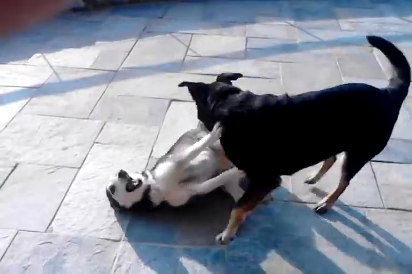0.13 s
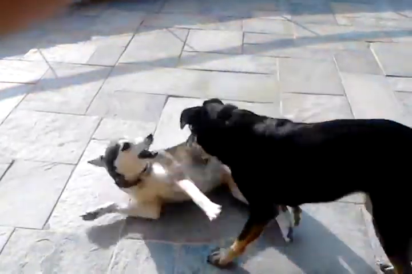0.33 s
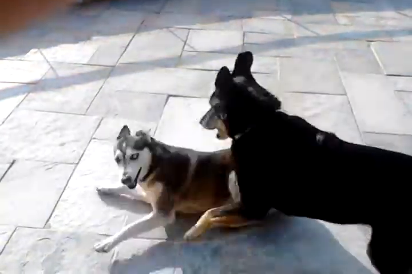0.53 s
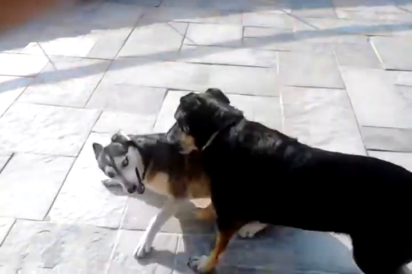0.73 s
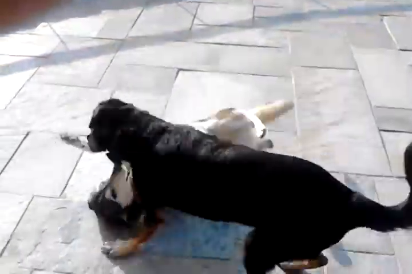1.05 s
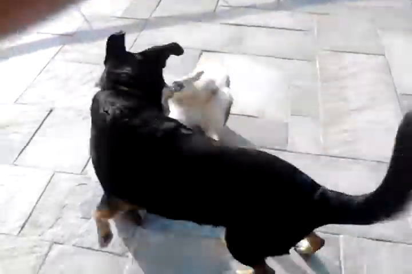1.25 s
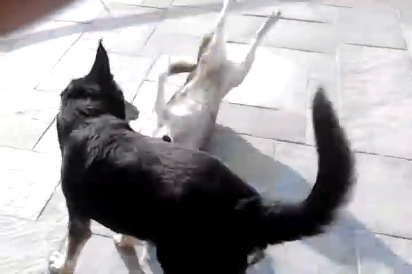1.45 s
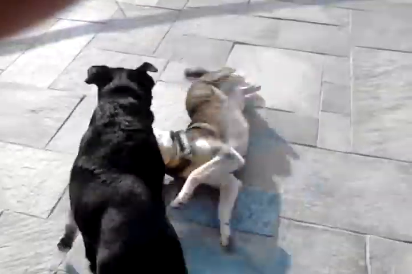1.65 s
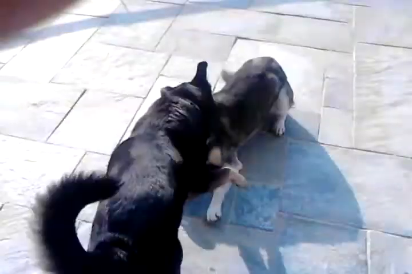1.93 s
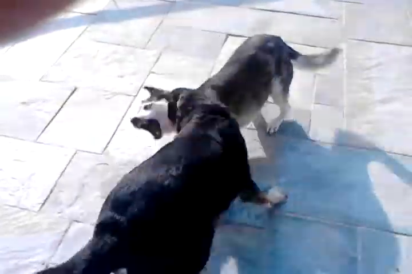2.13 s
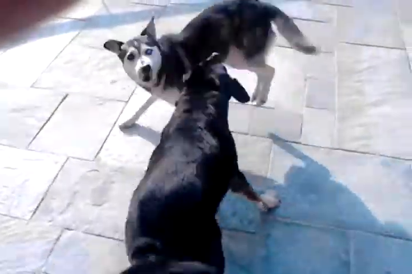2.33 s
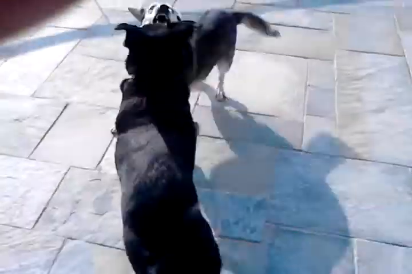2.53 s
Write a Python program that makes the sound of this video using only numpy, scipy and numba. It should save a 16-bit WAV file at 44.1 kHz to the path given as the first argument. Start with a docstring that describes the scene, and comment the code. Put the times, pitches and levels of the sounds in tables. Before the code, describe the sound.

Play-fighting dog growls in ragged, throaty bursts with hard catches, briefly pausing, then swelling; a second dog grunts low, claws tick and paws scuff on stone, close mono microphone, quiet open air with short wall echoes.

```python
"""A stone terrace: two dogs wrestle close by, heard in mono over quiet outdoor air.
One growls: a low chest tone, plus uneven pulses ringing in throat and mouth, with hard pops and snarls.
The other gives short rough grunts from similar pulses; thin squeals are brief wavering sine tones.
Paws thump as damped sine tones, claws click as noise bursts, and scuffs are noise mixed with grit.
Two short echoes and a faint noise tail stand for the slabs and nearby walls."""
import sys
import numpy as np
from scipy import signal
from scipy.fft import rfft, irfft
from scipy.io import wavfile
from scipy.ndimage import uniform_filter1d
from numba import njit

SR = 44100
rng = np.random.default_rng(int(sys.argv[2]) if len(sys.argv) > 2 else 0)


def store_pcm(level_fs):
    """Save levels as 16-bit WAV."""
    pcm = np.round(np.clip(level_fs, -1, 1) * 32767).astype(np.int16)
    wavfile.write(sys.argv[1], SR, np.atleast_2d(pcm).T)


N = 119070
T = np.arange(N) / SR  # time of every sample in seconds

# Colour of the outdoor background. Each row: frequency in Hz, strength in dB per Hz (relative).
AIR_COLOUR = [(25, -13.5), (70, -16.5), (150, 0), (300, 1.5), (700, -14.5), (1200, -6), (2200, -10),
              (3500, -10), (6500, -5), (9000, -31)]
# Strength of the growl, one list per stretch, before each part's overall level is added.
# Each row: time in seconds, chest tone in dB, throat in dB, mouth in dB.
GROWL_LEVELS = [
    [(0.0, -20.5, -18.5, -28), (0.046, -34.5, -26, -39.5), (0.078, -35.5, -29.5, -39),
     (0.086, -32.5, -36, -49), (0.108, -41, -34, -38), (0.182, -22.5, -18.5, -22), (0.2, -25, -32, -31),
     (0.242, -43, -33.5, -31.5), (0.278, -34, -36, -33.5), (0.32, -40, -45.5, -45), (0.34, -61.5, -51, -91)],
    [(0.5, -63, -73, -58), (0.522, -28.5, -40, -31), (0.582, -29.5, -28, -41), (0.592, -21.5, -26, -29.5),
     (0.616, -24, -26.5, -44), (0.722, -30, -28, -25), (0.744, -22, -23.5, -29),
     (0.868, -24.5, -16.5, -25.5), (0.89, -20.5, -17, -27.5), (0.982, -37, -17.5, -23.5),
     (1.0, -38, -13, -31)],
    [(1.0, -41, -16.5, -27), (1.072, -16, -22, -27.5), (1.084, -21.5, -21, -23.5), (1.178, -21, -12.5, -28),
     (1.202, -20.5, -28.5, -29.5), (1.22, -28.5, -15.5, -29.5), (1.258, -24, -23, -30),
     (1.302, -13.5, -15, -19.5), (1.342, -27, -16, -22.5), (1.39, -18.5, -19, -20.5),
     (1.46, -36.5, -30, -39)],
    [(1.46, -45, -53, -25), (1.478, -81, -35, -32), (1.51, -18.5, -25.5, -30), (1.558, -77, -33, -32),
     (1.59, -30.5, -48, -31), (1.618, -53, -36, -26), (1.66, -53, -49, -39.5), (1.676, -46, -32, -34),
     (1.71, -39, -45, -35.5), (1.76, -71, -42, -36), (1.8, -68, -60, -57)],
    [(1.81, -50, -58, -34), (1.842, -29, -24.5, -27.5), (1.88, -14, -18.5, -40), (1.922, -24.5, -14, -25.5),
     (1.95, -22, -24.5, -29.5), (1.988, -31, -22.5, -24), (2.06, -25, -15.5, -25), (2.134, -9, -22, -31),
     (2.168, -13.5, -19, -19.5), (2.218, -21.5, -16.5, -28.5), (2.25, -22, -11.5, -20)],
    [(2.25, -40, -15.5, -30), (2.29, -14.5, -18, -20), (2.314, -24.5, -10.5, -26), (2.348, -20.5, -22, -29),
     (2.388, -24.5, -20, -26), (2.442, -17, -18.5, -29), (2.548, -33, -15, -28),
     (2.574, -21.5, -18.5, -27.5), (2.672, -46.5, -34.5, -35), (2.692, -26, -19.5, -38),
     (2.7, -40, -30, -45)],
]
# Moments when the growl catches in a hard pop. Each row: time in seconds, level in dB.
POP_TIMES = [(0.15, -12), (0.826, -5), (0.854, -2.5), (0.892, 0), (0.911, -0.5), (1.163, 1), (1.265, -1.5),
             (1.32, -9), (1.885, -13.5), (1.919, -8.5), (2.243, -8), (2.261, -4), (2.308, -7), (2.325, -2),
             (2.353, -14), (2.375, -5.5), (2.408, -4), (2.562, -4.5)]


def from_db(db):
    """Turn decibels into gain."""
    return 10 ** (np.asarray(db) / 20)


def rms_one(x):
    """Scale a sound to an average (rms) level of 1."""
    return x / np.sqrt(np.mean(x ** 2) + 1e-20)


def in_time(rows):
    """Draw each column of a table as a curve with a value at every sample."""
    seconds, *columns = np.transpose(rows)
    return [np.interp(T, seconds, column) for column in columns]


def butter(x, hz, kind, order=2):
    """Keep low, high or middle frequencies with a Butterworth filter."""
    return signal.sosfilt(signal.butter(order, hz, kind, fs=SR, output="sos"), x)


def drift(rate_hz):
    """Random wander of average size 1, mostly slower than the given rate."""
    noise = rng.standard_normal(2 * N)
    return rms_one(butter(noise, rate_hz, "low")[N:])  # the first half lets the filter settle


def coloured(x, spectrum):
    """Give a sound the listed spectrum, with a filter that never rings ahead and has unit power gain."""
    hz, db = np.transpose(spectrum)
    f = np.linspace(0, SR / 2, 513)
    gain = from_db(np.interp(np.log(f + 1), np.log(hz), db))
    # folding the cepstrum puts all of the filter's response after each input
    cepstrum = irfft(np.log(gain))
    cepstrum[1:len(f) - 1] *= 2
    cepstrum[len(f):] = 0
    response = irfft(np.exp(rfft(cepstrum)))
    return signal.fftconvolve(x, response / np.linalg.norm(response))[:N]


def evened(x, window_s=0.026):
    """Hold the short-term level near 1 but keep faster beating."""
    size = int(window_s * SR) + 1
    power = uniform_filter1d(uniform_filter1d(x * x, size), size)
    return x / np.sqrt(np.abs(power) + 1e-12)


def swell(start, length, attack, release):
    """Rise, hold and fall, with the fall centred on the end."""
    rise = np.clip((T - start) / attack, 0, 1)
    fall = np.clip((start + length - T) / release + .5, 0, 1)
    return rise * fall


@njit
def resonate(x, w, r):
    """Ring like a hollow space: w sets the pitch at each sample, r how long it rings."""
    y = np.zeros(len(x))
    for i in range(2, len(x)):
        push = (1 - r * r) / 2 * (x[i] - x[i - 2])
        y[i] = push + 2 * r * np.cos(w[i]) * y[i - 1] - r * r * y[i - 2]
    return y


def tract(x, resonances, shift):
    """Add up resonances side by side, with alternating sign, all moved in pitch by shift."""
    out = np.zeros(N)
    for k, (hz, width, db) in enumerate(resonances):
        angle = 2 * np.pi * hz * shift * np.ones(N) / SR
        ringing = resonate(x, angle, np.exp(-np.pi * width / SR))
        out += (-1) ** k * from_db(db) * ringing
    return out


def ticks(cycles):
    """One unit pulse at the start of each cycle."""
    return np.diff(np.floor(cycles), prepend=0)


def outdoor_air():
    """Steady noise with the colour of the quiet outdoors."""
    return from_db(-46.5) * coloured(rng.standard_normal(N), AIR_COLOUR)


def rumble():
    """Noise below about 55 Hz that rises and falls with the growl's chest tone."""
    chest_db = in_time(np.vstack(GROWL_LEVELS))[0]
    return from_db(chest_db - 35.5) * rms_one(butter(rng.standard_normal(N), 55, "low"))


def scuffs(patchy_db=3.5):
    """Paws slide and coats rub: patchy hiss mixed with random ticks of grit."""
    # Each row: start in seconds, length in seconds, level in dB.
    slides = [(0, 0.063, -32.5), (0.121, 0.069, -30), (0.196, 0.12, -36.5), (0.4, 0.058, -32.5),
              (0.511, 0.11, -42), (0.685, 0.23, -32), (0.871, 0.077, -36), (0.93, 0.33, -41),
              (1.056, 0.078, -33.5), (1.286, .16, -35), (1.469, 0.087, -31), (1.551, 0.094, -29),
              (1.661, 0.085, -36), (1.755, .04, -28), (1.792, 0.071, -25), (1.867, .19, -32.5),
              (2.096, 0.14, -36.5), (2.25, 0.086, -33), (2.295, 0.066, -28.5), (2.371, 0.13, -31),
              (2.474, 0.16, -38), (2.632, .07, -36.5)]
    # Colour of contact with stone. Each row: frequency in Hz, strength in dB per Hz (relative).
    stone_colour = [(300, -5.5), (1200, -30.5), (2100, -1.5), (3000, 0), (4000, 0.5), (5200, 2), (6600, 5),
                    (7400, -8), (9000, -21)]
    attack_s, release_s = 0.0065, 0.066
    grit_per_s, grit_db = 900, -4
    level = sum(from_db(db) * swell(s, length, attack_s, release_s) for s, length, db in slides)
    hits = (rng.random(N) < grit_per_s / SR) * rng.choice([-1, 1], N)
    grit = hits * from_db(2.6 * np.minimum(rng.exponential(1, N), 3))
    rub = rng.standard_normal(N) * from_db(patchy_db * drift(47))
    return level * rms_one(coloured(rub + from_db(grit_db) * rms_one(grit), stone_colour))


def claws():
    """Claws strike stone: a short noise burst and skid, with one sharp crack just after the start."""
    # Each row: time in seconds, strength in dB before the noise or crack level is added.
    strikes = [(.206, -8), (.2138, -11), (.2395, -12.5), (.36, -19.5), (.368, -42), (.402, -18),
               (.407, -19), (.43, -21.5), (.675, -14), (.788, -7), (1.004, -7), (1.009, -16),
               (1.092, -10.5), (1.4702, -8.5), (1.475, -21), (1.56, -27), (1.621, -14.5), (1.741, -5.5),
               (1.749, -24), (1.783, -10), (1.809, -7), (2.085, -10), (2.09, -15.5), (2.141, -14),
               (2.473, -13), (2.649, -14.5)]
    # Colour of claw on stone. Each row: frequency in Hz, strength in dB per Hz (relative).
    stone_colour = [(300, -5.5), (1200, -30.5), (2100, -1.5), (3000, 0), (4000, 0.5), (5200, 2), (6600, 5),
                    (7400, -8), (9000, -21)]
    decay_s, skid_s = 0.0011, 0.017
    noise_db, skid_db, crack_db = -6, -12.5, 3.5  # the skid is relative to the burst
    level, cracks = np.zeros(N), np.zeros(N)
    for s, db in strikes:
        age = abs(T - s)
        fading = np.exp(-age / decay_s) + from_db(skid_db) * np.exp(-age / skid_s)
        level += from_db(db + noise_db) * (T >= s) * fading
        cracks += from_db(db + crack_db) * ticks(1.0 * (T >= s + decay_s))
    return coloured(level * rng.choice([-1, 1], N) + cracks, stone_colour)


def thumps(rise_s=0.00057):
    """Paws and bodies land: soft blows made of quickly damped tones."""
    # Each row: time in seconds, level in dB, lowest pitch in Hz.
    landings = [(0.18, -12.5, 243), (.269, -17, 254), (0.588, -13, 355), (1.943, -12.5, 290),
                (2.048, -9.5, 266), (2.087, -9, 250.7)]
    # Tones in each blow. Each row: ratio to the lowest pitch, width in Hz (wider dies faster), level in dB.
    body = [(1, 59.5, 6.5), (1.5, 100, -6.5), (2.8, 301, -9.5)]
    out = np.zeros(N)
    for s, db, hz in landings:
        age = np.maximum(T - s, 0)
        for ratio, width, mode_db in body:
            fade = np.exp(-np.pi * width * age) * (1 - np.exp(-age / rise_s))
            out += from_db(db + mode_db) * np.sin(2 * np.pi * hz * ratio * age) * fade
    return butter(out, 130, "high")


def squeals(waver=0.032):
    """Brief thin whistles in the voice: sine tones whose pitch wavers."""
    # Each row: start in seconds, length in seconds, level in dB, middle pitch in Hz.
    whistles = [(0.508, 0.045, -31, 1743), (0.97, 0.037, -23.5, 1733), (1.606, 0.016, -30.5, 1074),
                (1.662, 0.025, -30, 807)]
    wander = np.exp(waver * drift(120))
    out = np.zeros(N)
    for s, length, db, hz in whistles:
        tone = rms_one(np.sin(2 * np.pi * np.cumsum(hz * wander) / SR))
        out += from_db(db) * swell(s, length, 0.0056, 0.0073) * tone
    return out


def folds(pitch, rough, breath):
    """Vocal folds: voice cycles, and clear or ragged pulses with puffs of air and loose-tissue slaps."""
    jitter, shimmer_db = .06, 4  # unevenness of pitch and of pulse strength
    slip_cycles = .17  # how unevenly the ragged pulses fall
    flutter_hz, flutter_db, slap_db = 52, 0.5, -5
    cycles = np.cumsum(pitch * np.exp(jitter * rough * drift(70))) / SR
    flaps = np.cumsum(flutter_hz * np.exp(.3 * drift(29.8))) / SR
    beating = from_db(rough * flutter_db * np.cos(2 * np.pi * flaps))
    closing = cycles + slip_cycles * drift(130)
    # each puff is strongest at the start of its cycle
    puffs = rms_one(rng.standard_normal(N) * np.exp(-3 * (closing % 1)))
    ragged = rms_one(ticks(closing) * from_db(shimmer_db * drift(170))) + breath * puffs
    slaps = from_db(slap_db) * rms_one(ticks(flaps) * from_db(1.4 * drift(89)))
    clear = rms_one(ticks(cycles))
    voice = np.clip(1 - rough, 0, 1) * clear + rough * ragged
    return cycles, beating * voice + rough * slaps


def grunts(rough=.85, breath=0.16, attack_s=0.0099, release_s=0.015):
    """The second dog, mouth nearly shut: ragged pulses ring in low throat resonances."""
    # Each row: start in seconds, length in seconds, level in dB, pitch in Hz at the middle.
    calls = [(0.14, 0.094, -29.5, 132.7), (0.936, 0.13, -22, 126.8), (1.053, 0.049, -27.5, 138.8),
             (1.31, 0.11, -58, 134.6), (1.598, 0.096, -32, 139.3), (1.884, .1, -20, 142.5),
             (1.986, .09, -17.5, 148), (2.086, 0.14, -17.5, 147.6)]
    # Its throat, before all centres are lowered to 0.93. Each row: centre in Hz, width in Hz, level in dB.
    second_throat = [(275, 68, 3.5), (374.73, 190, -7.5), (573, 60, -5.5)]
    pitch, = in_time([(s + length / 2, hz) for s, length, db, hz in calls])
    pulses = folds(pitch, rough, breath)[1]
    voice = evened(butter(tract(pulses, second_throat, 0.93), [125, 800], "band", order=3))
    return voice * sum(from_db(db) * swell(s, length, attack_s, release_s) for s, length, db, hz in calls)


def catches():
    """Throat gain that dips just before each pop, as the throat shuts and pressure builds."""
    catch_s, catch_db = 0.0056, -4.5
    dips = sum(np.exp(-((T - s + catch_s) / catch_s) ** 2) for s, db in POP_TIMES)
    return from_db(catch_db * dips)


def pops(jaw_hz, rise_s=.0012, ring_s=0.0056):
    """Hard slaps: each is a short damped tone near the main throat resonance."""
    out = np.zeros(N)
    for s, db in POP_TIMES:
        age = np.maximum(T - s, 0)
        hz = np.interp(s, T, jaw_hz) * rng.uniform(0.925, 1.1)
        fade = (1 - np.exp(-age / rise_s)) * np.exp(-age / ring_s)
        out += from_db(db) * np.sin(2 * np.pi * hz * age) * fade
    return out


def snaps(pulses):
    """Short harsh snarls: the pulses ring in the higher resonances of an open mouth."""
    # Each row: start in seconds, length in seconds, level in dB.
    snarls = [(1.078, 0.035, -20.5), (1.503, .025, -45), (2.182, 0.016, -50)]
    # Each row: centre in Hz, width in Hz, level in dB.
    open_mouth = [(1350, 180, 6.5), (2000, 120, 0), (2700, 400, -2)]
    voice = evened(butter(tract(pulses, open_mouth, 1), [1000, 3500], "band"))
    return voice * sum(from_db(db) * swell(s, length, 0.0068, .015) for s, length, db in snarls)


def growl():
    """The main dog: a chest tone, and pulses that ring in throat and mouth and rasp past the teeth."""
    # Each row: time in seconds, pitch in Hz before jitter.
    pitch_rows = [(0, 175.7), (.12, 164.6), (.18, 189.4), (.5, 152.3), (.59, 181.4), (.69, 158.6),
                  (.76, 166.2), (.85, 180.2), (.98, 203.4), (1.04, 176), (1.11, 198.7), (1.22, 186.7),
                  (1.3, 202), (1.4, 205.6), (1.52, 176), (1.84, 178), (1.91, 212.4), (1.98, 192.8),
                  (2.1, 206.5), (2.16, 205), (2.22, 218), (2.29, 202.4), (2.36, 207.2), (2.43, 196.7),
                  (2.51, 190.9), (2.6, 166.6), (2.66, 156.9), (2.7, 190.6)]
    # How ragged the voice is. Each row: time in seconds, roughness from 0 to 1.
    rough_rows = [(0, 0.7), (.2, .9), (.52, 0.34), (.66, 0.4), (.8, 0.64), (.95, .9), (1.15, 0.48),
                  (1.38, 0.7), (1.55, .9), (1.86, .45), (2.0, .9), (2.12, 0.21), (2.3, .55), (2.55, 0.49),
                  (2.7, 0.7)]
    # The throat follows the jaw, one list per part. Each row: time in seconds, main resonance in Hz.
    jaw_rows = [
        [(0.0, 756), (0.096, 760), (0.216, 677), (0.266, 810), (0.34, 793)],
        [(0.5, 640), (0.842, 784), (0.89, 717.8), (1.09, 813.5), (1.116, 757), (1.296, 722), (1.31, 784),
         (1.46, 818.8)],
        [(1.48, 642), (1.552, 779), (1.622, 704.1), (1.656, 793), (1.712, 856), (1.75, 734)],
        [(1.81, 800), (1.852, 800), (1.958, 707), (1.986, 753.1), (2.382, 758.2), (2.394, 734), (2.642, 852),
         (2.7, 708.3)],
    ]
    # The mouth follows the lips, one list per part. Each row: time in seconds, mouth resonance in Hz.
    lip_rows = [
        [(0.0, 1880), (0.068, 1750), (0.1, 1950), (0.34, 1570)],
        [(0.5, 1860), (0.628, 1940), (0.688, 1654), (0.78, 1739), (0.828, 1630), (1.178, 1875), (1.352, 1532),
         (1.46, 1800)],
        [(1.81, 1870), (1.874, 1649), (2.002, 2055), (2.05, 1850), (2.132, 1580), (2.252, 1916), (2.374, 1645),
         (2.7, 1670)],
    ]
    # Resonances at a middling opening. Each row: centre in Hz, width in Hz, level in dB.
    throat_shape = [(376, 110, -11), (567, 55, -3), (749, 83, 1.5), (1110, 112, -7.5)]
    # Likewise for the mouth. Each row: centre in Hz, width in Hz, level in dB.
    mouth_shape = [(1310, 120, 8.5), (1852, 98, 15.5), (2260, 220, -26), (2600, 220, -14.5)]
    # Colour of air past the teeth. Each row: frequency in Hz, strength in dB per Hz (relative).
    rasp_colour = [(1000, -33.5), (2000, 2), (2800, 0), (3600, -14.5), (5000, -22), (8000, -34.5)]
    jaw_rest_hz, lips_rest_hz, tongue_wander = 763.6, 1850, 0.11
    chest_trim_db, mouth_trim_db = 0.5, -2  # added to the levels in the growl table
    rattle_db, rasp_db = -2.5, -10.5

    (pitch,), (rough,) = in_time(pitch_rows), in_time(rough_rows)
    (jaw_hz,), (lips_hz,) = in_time(np.vstack(jaw_rows)), in_time(np.vstack(lip_rows))
    chest_db, throat_db, mouth_db = in_time(np.vstack(GROWL_LEVELS))
    cycles, pulses = folds(pitch, rough, breath=0.73)

    # ragged pulses, with random signs, shake the chest around 208 Hz (110 Hz wide)
    shaking = tract(pulses * rng.choice([-1, 1], N), [(208, 110, 0)], 1)
    rattle = evened(butter(shaking, 330, "low", order=4))
    tone = np.cos(2 * np.pi * cycles) * from_db(5.3 * rough * drift(70))
    chest = evened(tone + from_db(rattle_db) * rough * rattle)

    # the tongue moves all the resonances a little, more when the voice is rough
    tongue = np.exp(tongue_wander * rough * drift(45))
    throat = tract(pulses, throat_shape, tongue * jaw_hz / jaw_rest_hz)
    throat = butter(throat, 1400, "low", order=3)
    throat = evened(butter(throat, 260, "high", order=3))
    mouth = tract(pulses, mouth_shape, tongue * lips_hz / lips_rest_hz)
    mouth = evened(butter(mouth, [1100, 3200], "band"))
    rasp = from_db(rasp_db) * evened(coloured(pulses, rasp_colour))

    voice = from_db(chest_db + chest_trim_db) * chest
    voice += from_db(throat_db) * throat * catches()
    voice += from_db(mouth_db + mouth_trim_db) * (mouth + rasp)
    return voice + pops(jaw_hz) + snaps(pulses)


def terrace(x):
    """Add reflections from slabs and walls, then a faint diffuse tail of fading noise."""
    # Each row: delay in seconds, level in dB.
    reflections = [(.0027, -22.5), (0.0141, -10)]
    t60_s, tail_db = .22, -14  # the tail's noise fades by 60 dB in t60_s
    tail = rng.standard_normal(N) * from_db(-60 * T / t60_s) * (T > .01)
    diffuse = signal.fftconvolve(x, tail / np.linalg.norm(tail))[:N]
    echoes = sum(from_db(db) * np.interp(T - s, T, x, left=0) for s, db in reflections)
    return x + butter(echoes + from_db(tail_db) * diffuse, 280, "high")


def scene():
    """Both dogs and their feet on the terrace, over rumble and outdoor air, alike in both channels."""
    background = outdoor_air() + rumble()
    dogs = scuffs() + claws() + thumps() + squeals() + grunts() + growl()
    mono = butter(terrace(dogs), 120.5, "high", order=8) + background
    return np.array([mono, mono])


def record(dry, top=0.68):
    """Add faint hiss to each channel, round off the peaks and cut the treble steeply."""
    cutoff_hz, hiss_db = 7450, -66
    hiss = from_db(hiss_db) * np.array([coloured(rng.standard_normal(N), AIR_COLOUR) for channel in dry])
    rounded = top * np.tanh((dry + hiss) / top)
    return signal.sosfilt(signal.ellip(8, .3, 65, cutoff_hz, fs=SR, output="sos"), rounded)


dry = scene()
out = record(dry)
store_pcm(out)
```